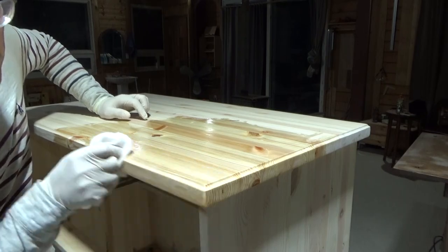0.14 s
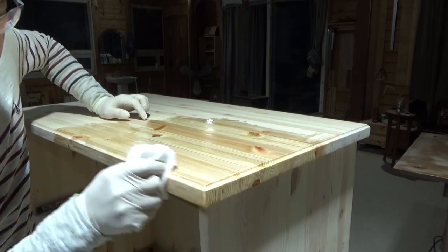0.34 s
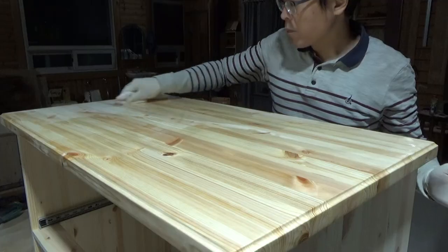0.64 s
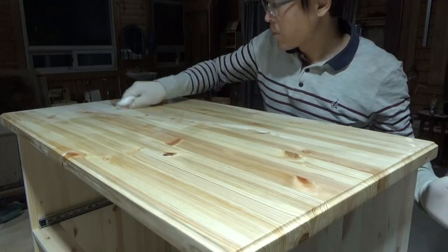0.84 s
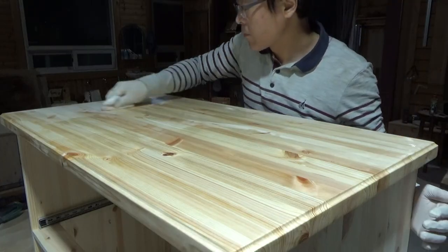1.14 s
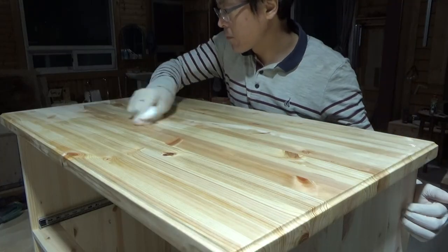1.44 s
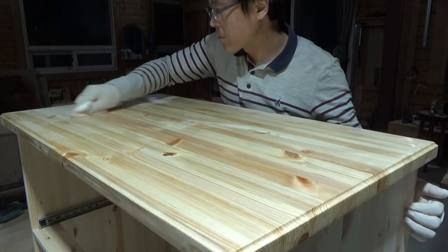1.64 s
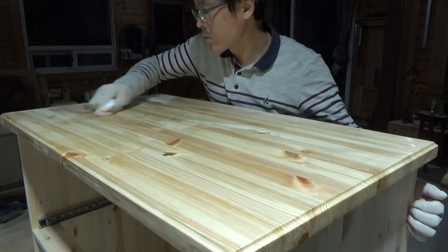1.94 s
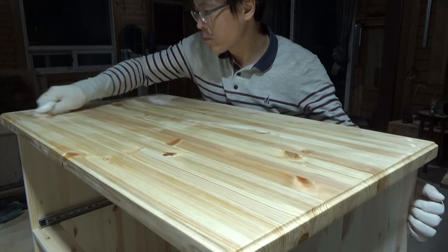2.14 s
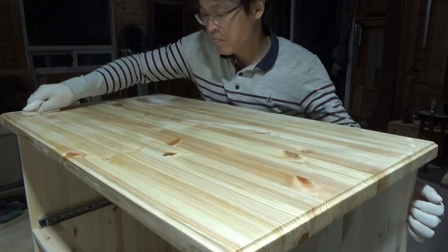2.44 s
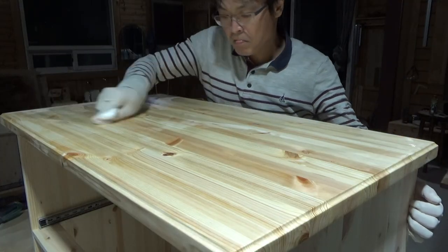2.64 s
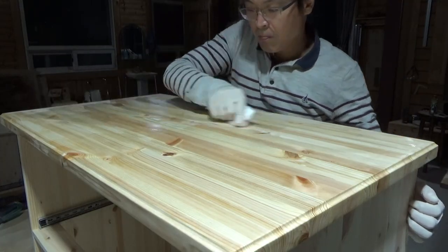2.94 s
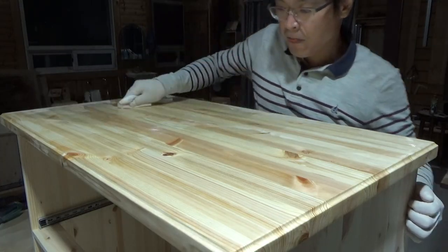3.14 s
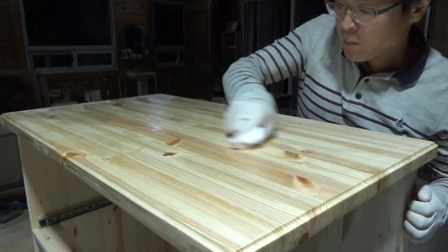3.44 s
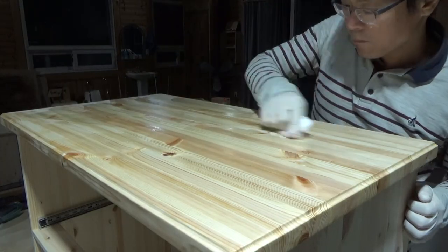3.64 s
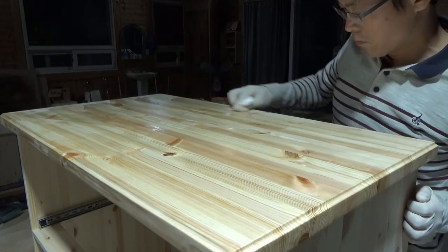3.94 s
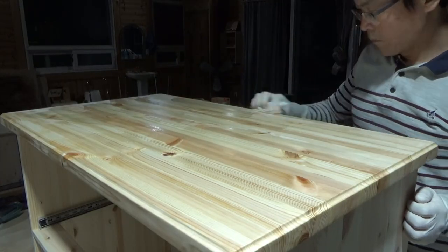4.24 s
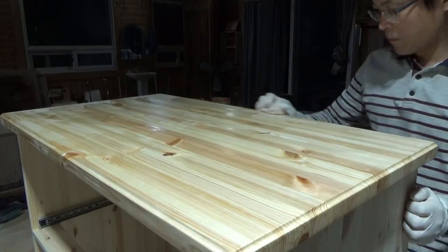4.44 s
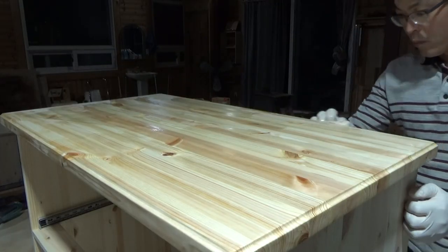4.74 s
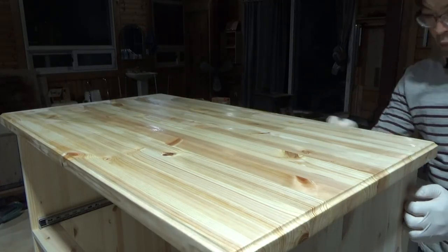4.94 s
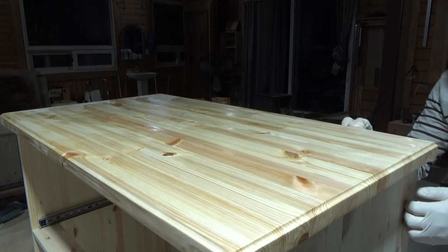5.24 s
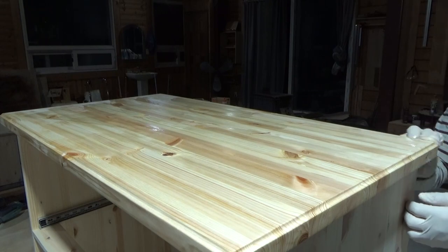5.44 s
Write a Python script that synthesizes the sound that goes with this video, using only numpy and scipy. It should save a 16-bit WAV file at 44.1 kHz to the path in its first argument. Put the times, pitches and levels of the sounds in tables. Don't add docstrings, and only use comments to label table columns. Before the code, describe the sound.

Close, dry cloth strokes rub to and fro on a wooden top in a humming workshop, broken by woody thumps and gritty footsteps.

```python
import sys
import numpy as np
from scipy import signal
from scipy.fft import rfft, irfft
from scipy.io import wavfile
from scipy.ndimage import uniform_filter1d

SR = 44100
rng = np.random.default_rng(int(sys.argv[2]) if len(sys.argv) > 2 else 0)


def attenuation_scalar(level_db):
    decades = np.asarray(level_db, float) / 20
    return 10 ** decades


def digitize_waveform(pressure):
    field = np.atleast_2d(pressure).T
    bounded = np.clip(field, -1, 1)
    quanta = np.round(bounded * 32767).astype(np.int16)
    wavfile.write(sys.argv[1], SR, quanta)


N = 246519

# [f/Hz, level/dB per Hz]
AIR_SPECTRUM = [(15, -26), (25, 3.5), (86, 1), (513, -6.5), (654, -9.5), (812, -9), (1060, -2), (1510, -14),
                (2810, -5.5), (3300, -10.5), (8490, -11.5), (13800, -25), (15800, -26)]
AIR_LEVEL_DB = -38
# [f/Hz, likeness 0-1]
AIR_LIKENESS = [(40, .9999), (100, 1), (300, 0.94), (800, 0.8), (3000, 0.7), (12000, 0.63)]
# [f/Hz, level/dB rms]
MAINS_HUM = [(60, -47.5), (180, -52.5)]

# [t/s of the top, roar level/dB, boom level/dB, fade/dB per s]
RUMBLE_SWELLS = [
    (.72, -33.5, -37, 8),
    (.95, -32.5, -55, 11),
    (1.4, -47, -43, 4),
    (2.11, -34, -45, 15),
    (2.3, -46, -39.5, 18),
    (2.55, -37.5, -34, 18),
    (3.12, -38, -52, 23.5),
    (3.4, -44, -44.5, 22),
    (3.88, -41.5, -58, 13),
    (4.1, -59, -54, 17),
]
# [f/Hz, level/dB]
ROAR_SPECTRUM = [(300, 0), (500, -2), (850, 0.5), (1150, 0), (1700, -5), (3000, -28), (6000, -60)]
# [f/Hz, width/Hz, level/dB]
HOLLOW_MODES = [(61, 13, 10), (127, 14, -5.5), (202.2, 27, 16.5), (249, 14, 5.5), (368, 24, -8)]
RUMBLE_START_S, SWELL_DB_PER_S = .68, 48

# [f/Hz, t60/s]
SHOP_DECAY = [(200, 0.63), (1000, 0.62), (3000, 0.91), (8000, 0.31)]

# [t/s, rise/s, hold/s, level/dB, crunch
# level/dB over the sole]
SCUFFS = [
    (0.671, .006, 0.21, -32, -8),
    (1.919, 0.0068, 0.018, -30, -15),
    (1.961, 0.068, 0.044, -24, -9.5),
    (3.096, 0.054, 0.054, -15.5, 4),
    (3.84, 0.0093, .005, -35, 2),
    (4.316, .005, 0.025, -33.5, -6),
    (4.509, 0.017, .005, -34, -4),
    (4.998, 0.015, 0.037, -21, -6),
    (5.12, .02, .085, -40, -18),
    (5.464, 0.017, 0.0054, -28.5, -3),
]
# [sole f/Hz, sole width/octaves, crunch f/Hz, crunch width/octaves, left-right/dB]
SCUFF_HUMPS = [(780, 0.18, 470, .55, 1.1), (680, 0.78, 2200, 0.49, 1), (715, 0.43, 1670, 0.72, 0.5),
               (1120, 0.74, 1870, 0.63, -2), (710, 0.36, 300, .4, 1), (765, 0.26, 1900, 0.45, .1),
               (1190, 0.58, 2300, 0.26, .1), (1040, 0.59, 2400, 0.52, -2), (1710, 0.041, 1400, 0.28, 2),
               (1590, 0.12, 2570, 0.33, 3)]
SCUFF_RISE_DB, SCUFF_FALL_DB_PER_S, SCUFF_END_DB = 10.5, 203, -45
CRUNCH_GROWTH = 1

# [t/s, peak level/dB, brightest f/Hz, damping/factor]
KNOCKS = [(0.674, -24.5, 200, 0.54), (.704, -29, 600, 1.3), (2.375, -12.5, 260, 1.5),
          (2.386, -24, 190, 1.7), (2.396, -22, 65, 0.62), (2.421, -19.5, 480, 1.3),
          (2.429, -12.5, 260, 1.3), (2.448, -21, 260, 0.7), (2.479, -15.5, 320, 3.4),
          (2.506, -14, 152, 1.6), (2.52, -21, 260, 1.8), (2.559, -36, 200, 2), (3.858, -41, 242, 1.1),
          (4.329, -25, 178, 1.2), (4.964, -27, 320, 0.64), (5.553, -13.5, 300, 1.4), (5.559, -16, 617, 1.6),
          (5.574, -21, 420, 1.2)]
# [f/Hz, t60/s]
PANEL_MODES = [(60, 0.42), (112, 0.21), (205, 0.066), (290, 0.085), (345, 0.071), (540, 0.08), (680, 0.064),
               (830, 0.023)]
# [t/s, peak level/dB, f/Hz, ring/ms]
SNAPS = [
    (2.0605, -11.5, 990, 0.42),
    (2.073, -18.5, 2050, 0.55),
    (2.402, -17, 1200, 0.98),
    (3.1893, -12, 2210, 0.74),
    (3.2025, -21, 1980, 0.98),
    (3.273, -11, 5770, 0.23),
    (3.935, -17.5, 5500, .4),
    (4.527, -30, 6240, 1.5),
    (5.0158, -19, 2420, 2),
    (5.0358, -17, 1950, 1.4),
]

# [t/s, stall depth/dB, half length/s]
TURNS = [(0.036, 9, 0.013), (0.296, 11.5, 0.014), (0.545, 12, 0.012), (0.811, 7, 0.026),
         (1.073, 8.5, 0.012), (1.339, 6.5, 0.033), (1.591, 11.5, 0.0076), (1.843, 7.5, 0.02),
         (1.97, 1.1, 0.039), (2.172, 7, 0.031), (2.348, 11, 0.013), (2.557, 10, 0.023), (2.96, 7, 0.016),
         (3.285, 8.5, 0.026), (3.66, -0.3, .03), (3.913, 4, 0.038), (4.195, 14, 0.0071), (4.438, 11, 0.021),
         (4.727, 11, 0.022), (4.947, 11, 0.022), (5.179, 8, 0.034), (5.345, 11, 0.01), (5.518, 12.5, 0.02)]
# [t/s of the push, steady level/dB, push level/dB above it, brightness 0-1 from speed, drag into the board/dB]
STROKES = [(.01, -37, 2, .2, 12), (.064, -33, 5, 0.41, 7.5), (.43, -32, 3, 0.45, 7),
           (.67, -32.5, 2, 0.49, 7), (.93, -29, 2, 0.4, 5), (1.14, -32, 2, 0.42, 1),
           (1.52, -28.5, 0, 0.38, -1.5), (1.72, -30.5, 2.5, 0.34, 0), (1.89, -30, -0.5, 0.39, -2),
           (2.05, -31.5, 3, 0.33, -2), (2.22, -32, 2, 0.37, -2), (2.39, -34.5, 4, .35, 5),
           (2.905, -31.5, 9.5, 0.41, 2.3), (2.99, -27.5, 5.5, 0.36, -1.5), (3.53, -27.5, 5, 0.53, 3.5),
           (3.72, -29.5, 6, 0.56, -0.5), (4.08, -30, 2, 0.47, -5), (4.3, -30.5, 0.5, .52, -1),
           (4.57, -30, 2.5, .53, 0.5), (4.78, -31.5, 1.5, 0.45, 2), (5.06, -32, 4, 0.4, 6),
           (5.22, -34, 1, 0.37, 2), (5.46, -32.5, 2, .37, -1), (5.57, -33.5, 2, .1, 0)]
PUSH_RISE, PUSH_FALL, EARLY_CUT = 0.28, 0.38, 0.1
PUSH_LIFT, PUSH_BRIGHT = 1.03, .011
SPEED_UP = 0.044
# [t/s, nearness to the edge 0-1, left-right/dB]
HAND_PLACE = [(0, 0.6, .6), (.2, 0.44, 2.5), (.75, 0.34, 2.7), (1.5, 0.35, 2.5), (2.7, 0.1, 3.5),
              (2.9, 0.96, 0.3), (3.2, 0.4, 1.8), (3.35, 0.16, 3), (3.55, 0.96, .4), (3.68, .98, -1.5),
              (3.85, 0.9, 2.5), (4.1, .94, -.1), (4.5, 0.97, 0.3), (5.59, 1, -1.5)]
# [f/Hz, level/dB per Hz]
CLOTH_SPECTRUM = [(80, -10), (300, -15), (900, -7), (2100, -9.5), (3300, -7.5), (5000, -4), (6800, -2),
                  (8600, -6.5), (10500, -3.5), (12000, -6), (13500, -13.5), (15800, -27)]
# [f/Hz, level/dB]
SPEED_TILT = [(2000, -3), (5500, -5.5), (7500, 0), (10000, 19.5), (14000, 19)]
# [f/Hz, share 0-1]
DRAG_SHARE = [(500, 0.97), (2500, 0.75), (4500, 0.26), (6500, 0.09)]
# [f/Hz, factor]
STALL_SHARE = [(1000, 0.27), (3000, 1), (7000, 1.4), (13000, 1.77)]
# [f/Hz, level/dB]
EDGE_TILT = [(3000, -1.5), (6000, -1), (7300, 1), (8700, 4.5), (10000, 0), (11300, -8.5), (13000, -5.5),
             (15000, 0.5)]
# [f/Hz, likeness 0-1]
CLOTH_LIKENESS = [(300, 0.97), (1000, 0.35), (2200, 0.84), (3300, 1), (4500, 0.96), (6000, 0.88),
                  (8800, .7), (10500, 0.98), (12000, 0.95)]
# [f/Hz, factor]
LEAN_SHARE = [(1500, 0.46), (4500, 0.63), (9000, 1.64), (13000, 0.3)]


def evened(x):
    return x / np.sqrt(np.mean(x ** 2) + 1e-20)


def read(points, hz):
    f, value = np.transpose(points)
    return np.interp(np.log(hz + 1), np.log(f + 1), value)


def add(mix, s, sound):
    part = mix[round(s * SR):][:len(sound)]
    part += sound[:len(part)]


def grit(count, per_s, spread_db):
    chance, size, sign = rng.random((3, count))
    height = attenuation_scalar(-spread_db * np.log(np.maximum(size, .004)))
    return evened((chance < per_s / SR) * height * np.sign(sign - .5))


def shaped(x, field_db, size=512):
    hop = dict(nperseg=size, noverlap=size * 3 // 4)
    hz, t, z = signal.stft(x, SR, **hop)
    gain = attenuation_scalar(field_db(hz[:, None], t))
    gain = gain / np.sqrt(np.mean(gain.reshape(-1, len(t)) ** 2, 0))
    return signal.istft(z * gain, SR, **hop)[1][..., :x.shape[-1]]


def pair(a, b, same):
    likeness = np.clip(read(same, np.fft.rfftfreq(N, 1 / SR)), 0, 1)
    mid = np.sqrt((1 + likeness) / 2) * rfft(a)
    side = np.sqrt((1 - likeness) / 2) * rfft(b)
    return irfft([mid + side, mid - side], N)


def patches(hz, t, bins, frames):
    noise = rng.standard_normal((len(hz), len(t)))
    return evened(uniform_filter1d(uniform_filter1d(noise, bins, 0), frames, 1))


def air():
    a, b, c = rng.standard_normal((3, N))
    t = np.arange(N) / SR

    def colour(hz, u):
        return read(AIR_SPECTRUM, hz) + 4.1 * patches(hz, u, 8, 4)

    noise = shaped(pair(a, b, AIR_LIKENESS), colour, size=4096)
    waver = attenuation_scalar(0.61 * evened(uniform_filter1d(c, 6000)))
    hum = sum(attenuation_scalar(db) * np.sqrt(2) * np.sin(2 * np.pi * hz * t) for hz, db in MAINS_HUM)
    return attenuation_scalar(AIR_LEVEL_DB) * noise + waver * hum


def drone(noise, hz, width):
    offset = 2 * (np.fft.rfftfreq(N, 1 / SR) - hz) / width
    ring = irfft(rfft(noise) / (1 + offset ** 2), N)
    return evened(ring / uniform_filter1d(ring ** 2 + 1e-9, 1500) ** 0.29)


def rumble():
    top, roar_db, boom_db, fade = np.transpose(RUMBLE_SWELLS)[..., None]
    t = np.arange(0, N, 100) / SR
    swells = attenuation_scalar(-np.maximum(SWELL_DB_PER_S * (top - t), fade * (t - top))) * (t > RUMBLE_START_S)

    def level(db):
        return np.interp(np.arange(N) / SR, t, np.linalg.norm(attenuation_scalar(db) * swells, axis=0))

    def colour(hz, u):
        return read(ROAR_SPECTRUM, hz) + 1.75 * patches(hz, u, 3, 4)

    a, b, c = rng.standard_normal((3, N))
    roar = shaped(pair(a, b, AIR_LIKENESS), colour, size=2048)
    boom = evened(sum(attenuation_scalar(db) * drone(c, hz, width) for hz, width, db in HOLLOW_MODES))
    return roar * level(roar_db) + boom * level(boom_db)


def shop(x):
    taps = np.zeros((2, N))
    at = np.arange(300, SR - 20, 20) + rng.integers(0, 20, (2, (SR - 301) // 20))
    np.put_along_axis(taps, at, rng.choice([-1., 1.], at.shape), 1)
    hz, t, z = signal.stft(pair(*taps, AIR_LIKENESS)[:, :SR], SR, nperseg=256)
    decay = attenuation_scalar(-60 * t / read(SHOP_DECAY, hz)[:, None])
    tail = signal.istft(z * decay, SR, nperseg=256)[1]
    return signal.fftconvolve(x[None], tail / np.linalg.norm(tail[0]), axes=1)[:, :N]


def scuff(row, sole_hz, sole_octaves, crunch_hz, crunch_octaves):
    start, rise, hold, top_db, crunch_db = row
    t = np.arange(SR // 2) / SR
    rise_db = np.minimum(SCUFF_RISE_DB * (t / max(rise, .002) - 1), 0)
    press_db = rise_db - SCUFF_FALL_DB_PER_S * np.maximum(t - rise - hold, 0)

    def hump(hz, at, octaves):
        return np.exp(-.5 * (np.log2((hz + 1) / at) / max(octaves, .03)) ** 2)

    def colour(hz, u):
        crunch = attenuation_scalar(crunch_db + CRUNCH_GROWTH * np.interp(u, t, press_db))
        both = hump(hz, sole_hz, sole_octaves) + hump(hz, crunch_hz, crunch_octaves) * crunch
        return 20 * np.log10(both + 0.017)

    lift = np.clip((top_db + press_db - SCUFF_END_DB) / 9, 0, 1) * np.minimum(t / 0.0035, 1)
    return start, shaped(grit(len(t), 7000, 1.3), colour) * attenuation_scalar(top_db + press_db) * lift


def knock(db, hz, damping):
    t = np.arange(SR // 4) / SR
    ring = np.zeros(len(t))
    for f, t60 in PANEL_MODES:
        mode_db = -7.5 * np.log2(f / hz) ** 2 - 60 * t * damping / t60
        ring += attenuation_scalar(mode_db) * np.sin(2 * np.pi * f * t)
    return attenuation_scalar(db - 12.0) * ring * (1 - np.exp(-t / 0.0032))


def snap(db, hz, ring_ms):
    t = np.arange(600) / SR
    decay = np.exp(-1000 * t / max(ring_ms, .1))
    return attenuation_scalar(db) * decay * np.sin(2 * np.pi * hz * t) * (1 - np.exp(-hz * t / 0.2))


def strokes(t):
    ends = np.r_[0, np.transpose(TURNS)[0], N / SR]
    k = np.clip(np.searchsorted(ends, t) - 1, 0, len(STROKES) - 1)
    at, steady_db, push_db, bright, drag_db = np.transpose(STROKES)[:, k]
    length = np.diff(ends)[k]
    fall = PUSH_FALL * length - EARLY_CUT * (length + ends[k] - at)
    push = push_db * np.exp(-((t - at) / np.where(t < at, PUSH_RISE * length, fall)) ** 2)
    bright = bright + PUSH_BRIGHT * push + SPEED_UP * ((t - ends[k]) / length - .5)
    return uniform_filter1d([steady_db + push, bright, drag_db - PUSH_LIFT * push], size=1300, axis=1)


def cloth():
    t = np.arange(N) / SR
    level_db, bright, drag_db = strokes(t)
    s, near, pan_db = np.transpose(HAND_PLACE)
    stall_db = sum(db * np.exp(-abs((t - at) / (1.2 * half)) ** 1.63) for at, db, half in TURNS)

    def colour(hz, u):
        stall = np.interp(u, t, stall_db) * (1 - read(STALL_SHARE, hz))
        speed = read(SPEED_TILT, hz) * (np.interp(u, t, bright) - .55)
        drag = read(DRAG_SHARE, hz) * np.interp(u, t, drag_db)
        edge = read(EDGE_TILT, hz) * np.interp(u, s, near)
        side = np.multiply.outer([.5, -.5], read(LEAN_SHARE, hz) * np.interp(u, s, pan_db))
        return side + read(CLOTH_SPECTRUM, hz) + edge + speed + drag + stall + 0.85 * patches(hz, u, 9, 14)

    fibres = pair(grit(N, 14000, 1.22), grit(N, 14000, 2.9), CLOTH_LIKENESS)
    middle = fibres.mean(0)
    narrow = attenuation_scalar(-8.5 * np.interp(t, s, near))
    fibres = middle + narrow * (fibres - middle)
    flutter_db = 0.97 * evened(uniform_filter1d(rng.standard_normal(N), 900))
    return shaped(fibres, colour) * attenuation_scalar(level_db - stall_db + flutter_db + 1.44)


def scene():
    feet, blows = np.zeros((2, N)), np.zeros(N)
    for row, (*humps, pan_db) in zip(SCUFFS, SCUFF_HUMPS):
        s, sound = scuff(row, *humps)
        add(feet[0], s, attenuation_scalar(pan_db / 2) * sound)
        add(feet[1], s, attenuation_scalar(-pan_db / 2) * sound)
    for s, *blow in KNOCKS:
        add(blows, s, knock(*blow))
    for s, *tick in SNAPS:
        add(blows, s, snap(*tick))
    wipe = cloth()
    echoes = shop(attenuation_scalar(-7.5) * feet.mean(0) + attenuation_scalar(4) * blows + attenuation_scalar(-17) * wipe.mean(0))
    return wipe + attenuation_scalar(-2.5) * feet + attenuation_scalar(8.0) * blows + echoes + rumble() + air()


def band_limit(x):
    return signal.sosfilt(signal.butter(12, 15950, fs=SR, output="sos"), x)


def record(dry):
    return band_limit(dry)


dry = scene()
out = record(dry)
digitize_waveform(out)
```